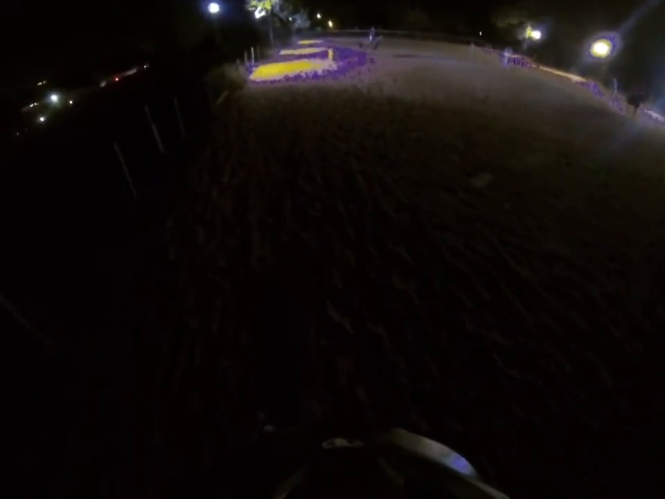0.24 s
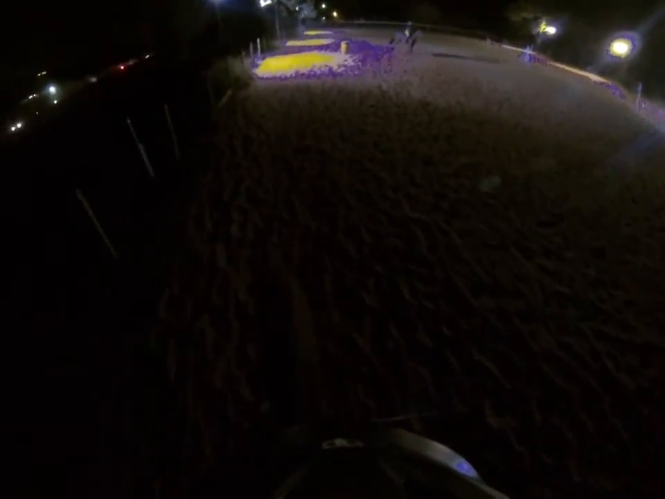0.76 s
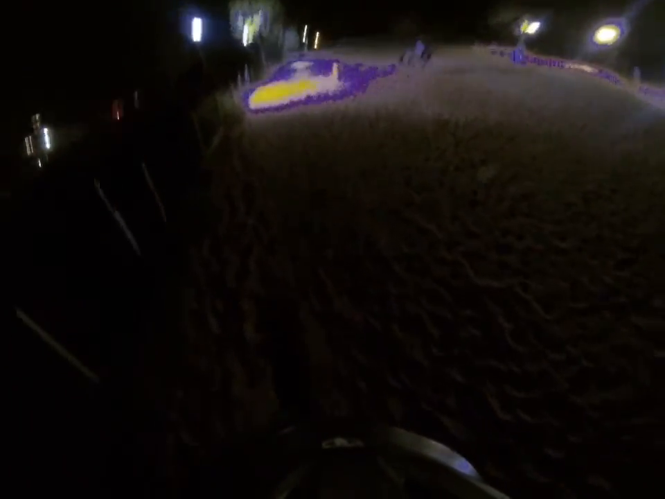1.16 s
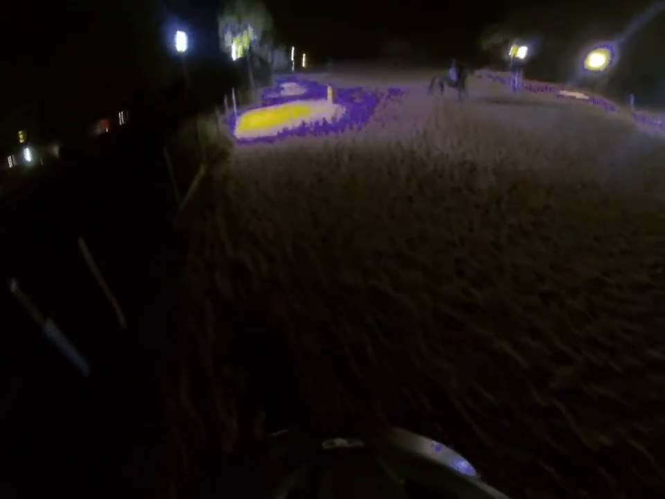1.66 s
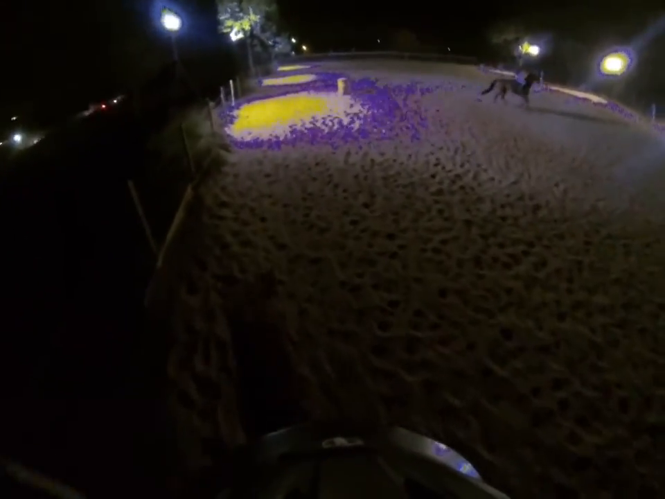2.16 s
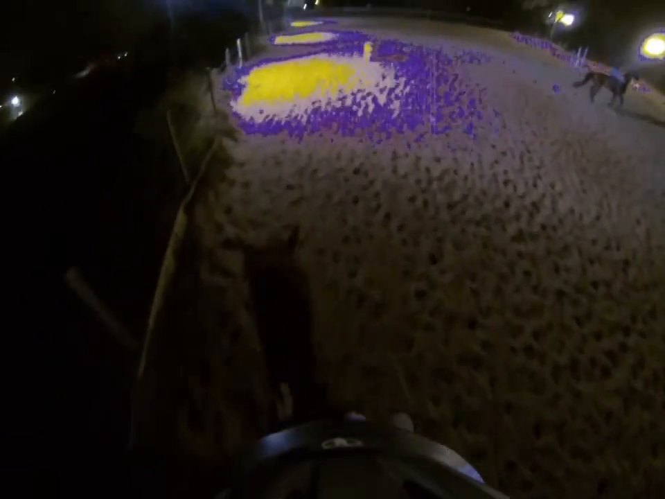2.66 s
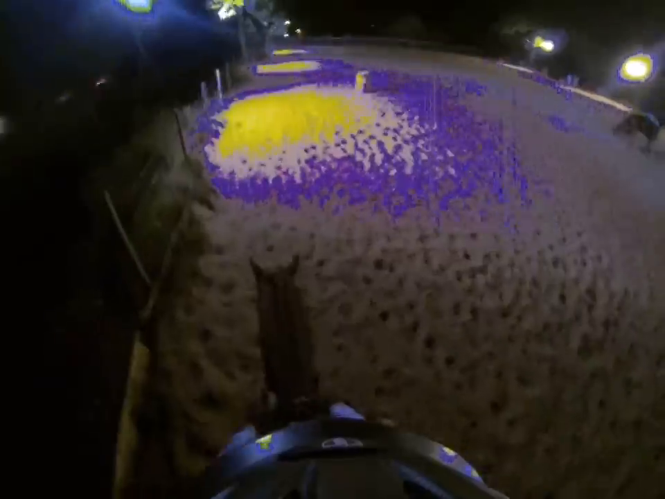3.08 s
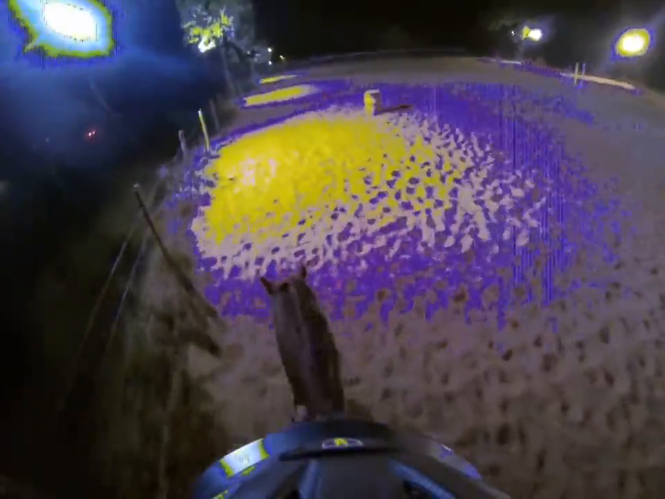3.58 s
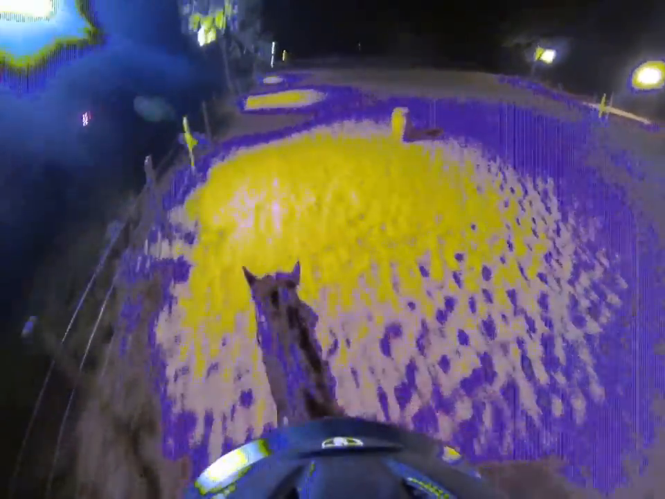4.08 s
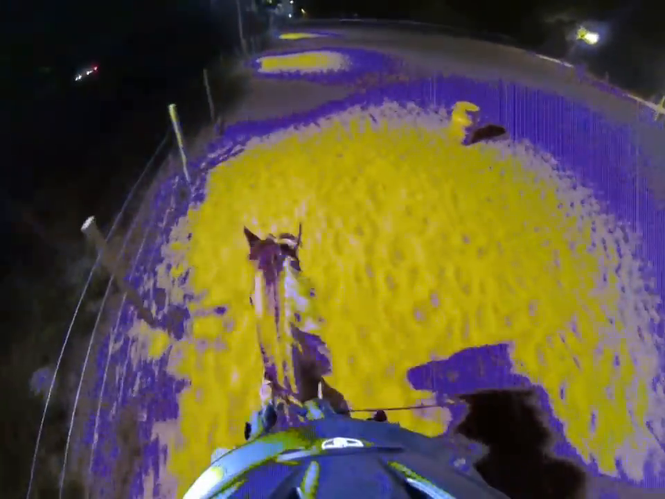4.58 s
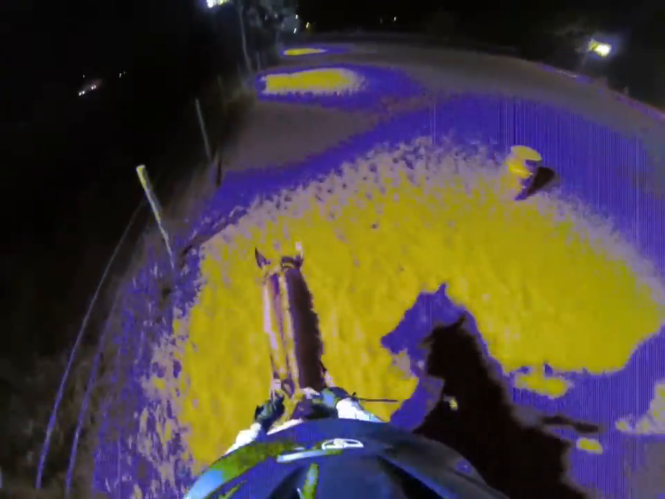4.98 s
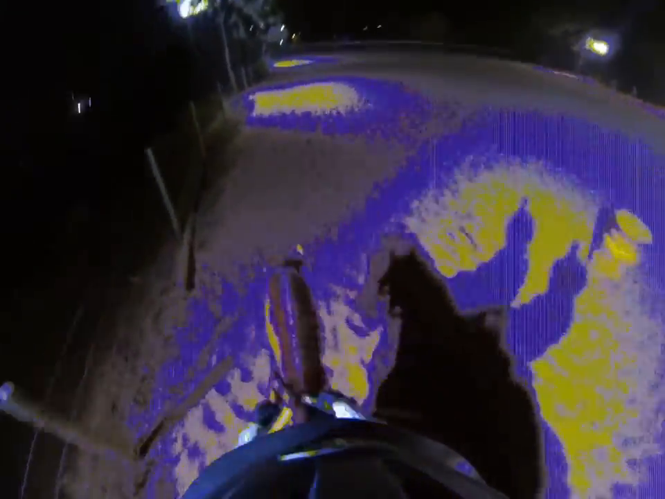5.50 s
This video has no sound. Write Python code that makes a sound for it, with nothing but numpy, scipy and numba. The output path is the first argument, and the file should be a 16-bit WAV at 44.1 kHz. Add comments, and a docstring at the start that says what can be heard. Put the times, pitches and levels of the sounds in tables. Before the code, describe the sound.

A horse canters on sand, heard through one microphone shut inside a camera housing on the rider's helmet. From about 0.4 seconds, each stride jolts the mount into a very deep, close, muffled boom that dies quickly, repeating roughly every 0.6 seconds until the last at about 5.2 seconds. Just ahead of each boom come a faint hoof thud and a soft, dull spray of sand. The loudest booms overload slightly, adding small bright clicks and briefly pushing the background down. From about 1.4 seconds, buckles and bit give faint, short, irregular metallic ticks through the case. Near 2.8 seconds one stride breaks into two lighter steps, then the even rhythm returns, with a firmer jolt at 4 seconds. A low, uneven rumble lingers between strides, and a quiet, slightly hollow hiss with a thin, high electronic whine runs throughout.

```python
"""Sand arena, from the saddle: one microphone shut inside the housing of a camera on the rider's helmet. Hiss
and a thin electronic whine run throughout. The horse canters, about 0.6 s a stride: a hind hoof thuds faintly
below, the diagonal pair throws sand, then the jolt booms in the mount near 41 Hz, right at the microphone. The
loudest booms knock the housing against its stops in small, bright ticks and snap the limiter down. From 1.4 s
the tack ticks faintly through the case; near 2.8 s one stride breaks into two lighter steps."""
import sys
import numpy as np
from scipy import signal
from scipy.fft import rfft, irfft
from scipy.io import wavfile
from scipy.ndimage import uniform_filter1d, minimum_filter1d
from numba import njit

SR = 44100
rng = np.random.default_rng(int(sys.argv[2]) if len(sys.argv) > 2 else 0)


def pcm_store(signal):
    """Save signal as 16-bit PCM."""
    levels = np.round(np.clip(np.atleast_2d(signal), -1, 1) * 32767)
    wavfile.write(sys.argv[1], SR, levels.astype(np.int16).T)


N = 253134
TIME = np.arange(N) / SR

# Canter strides as they reach the helmet; the fifth takes two rows: time_s, jolt_db, softness_s,
# check_after_s, rebound_after_s, rebound_db, hind_thud_db, spray_db, spray_decay_s
CANTER_STRIDES = [(0.3615, 11.5, 0.0062, .061, 0.16, -20.5, -60, -52.5, 0.023),
                  (0.9712, 10.7, 0.007, .061, 0.17, -3, -57, -57.5, .22),
                  (1.5808, 12.5, 0.0061, .061, 0.16, -18, -66, -55.5, .036),
                  (2.2048, 10, .0061, .061, .116, -5.5, -53, -54.5, 0.089),
                  (2.7905, 0, .0058, 0.051, 0.14, 3, -57.5, -59, .08),
                  (2.8564, 7.5, 0.0076, .037, .225, -2, -57.5, -58.5, 0.26),
                  (3.4124, 8.5, 0.0066, 0.058, 0.0927, -5, -65, -57.5, 0.089),
                  (4.0280, 11.5, 0.0039, .061, 0.17, -7.5, -52.5, -49, .05),
                  (4.6371, 8.5, 0.00554, .061, 0.14, 0.5, -69, -57, 0.13),
                  (5.247, 8, 0.0052, 0.038, .118, -11.5, -62, -54, 0.038)]
# Spectrum of the shuddering housing: frequency_hz, relative_db
SHUDDER_SPECTRUM = [(30, -3.5), (75, 6), (130, -6), (250, -18.5), (500, -24.5), (1500, -60.5)]
# Spectrum of the mount's restless rumble: frequency_hz, relative_db
RUMBLE_SPECTRUM = [(8, -0.5), (16, 4), (30, -18.5), (42, -2), (60, -20), (80, -16), (120, -33.5),
                   (200, -50), (400, -77)]
# Spectrum of thrown sand, heard through the case: frequency_hz, relative_db
SAND_SPECTRUM = [(100, -9), (300, -10), (600, -1), (1050, 0), (1500, -7.5), (2500, -11.5), (6000, -26.5),
                 (12000, -41.5)]
# Ticks of buckles and bit: start_s, level_db (relative to TACK_DB), pitch_hz,
# upper_rings_db (relative to the main ring), bounce_db (relative to the first strike), decay_s
TACK_TICKS = [(1.3786, -42, 2480, -18, -15, 0.0047), (2.1144, -42, 2470, -15, -1, 0.004),
              (2.354, -40, 2720, -16, -7, 0.0045), (2.778, -44, 2490, -7.5, -4, 0.0054),
              (3.365, -39, 2350, -17.5, -12, 0.0046), (3.958, -47, 2430, -18, -10, 0.004),
              (4.6135, -44.5, 2400, -17, -7, 0.004), (4.8474, -40.5, 2040, -26, -17, 0.0031),
              (5.1742, -37, 2380, -20, -19, 0.004)]
# Upper rings of the buckles: pitch_hz, width_hz, relative_db
BUCKLE_RINGS = [(3680, 250, 3), (4600, 350, 4), (6210, 230, -2.5)]
# Spectrum of the camera's hiss: frequency_hz, relative_db
HISS_SPECTRUM = [(88, -17), (150, 1), (253, -12.5), (302, -8.5), (381, -10.5), (471, -6), (561, -10),
                 (1040, -11), (1630, -11.5), (2180, -13.5), (5870, -19.5), (6600, -20), (11600, -28.5),
                 (13300, -29), (15500, -48.5)]
# Resonances of the air shut in around the microphone: pitch_hz, width_hz, level_db
CASE_RESONANCES = [(276.5, 65, -64.5), (1049, 29, -70), (2237, 240, -69.5)]

MOUNT_HZ, MOUNT_T60_S = 41.31, 0.35
SWAY_HZ, SWAY_T60_S, SWAY_SHARE = 14.13, 0.48, .065
NUDGE_DB, CHECK_DB, PAIR_THUD_DB = -25, -14, -65.5  # relative to the jolt
NUDGE_LEAD_S, HIND_LEAD_S, PAIR_LEAD_S = .0455, .108, 0.031  # ahead of the jolt
NUDGE_SOFTNESS_S, REBOUND_SOFTNESS_S = 0.0052, 0.0078
STOP_SWING, STOP_KNOCK_DB, STOP_KNOCK_CUTOFF_HZ = 1.13, -24.5, 1100
TACK_DB, RING_WIDTH_HZ, BOUNCE_AFTER_S = -7, 610, 0.01
FRAME_HZ, WHINE_HZ, TOP_HZ = 48, 6455, 15100
HEADROOM_UP, HEADROOM_DOWN = .7, .99  # full scale is 1
OVERREACH, MARGIN_DB, RECOVERY_DB_PER_S = 1.25, 0.46, 12.5


def mount():
    """At the microphone: pushes through the rider set the camera bouncing and the helmet swaying."""
    force = np.zeros(N)
    for time_s, jolt_db, softness_s, check_after_s, rebound_after_s, rebound_db, *_ in CANTER_STRIDES:
        # the rider's seat nudges the helmet just before the jolt and checks it just after
        force += push(time_s - NUDGE_LEAD_S, jolt_db + NUDGE_DB, NUDGE_SOFTNESS_S)
        force += push(time_s, jolt_db, softness_s)
        force += push(time_s + check_after_s, jolt_db + CHECK_DB, softness_s)
        # the rider rises out of the stride and pulls the other way
        force -= push(time_s + rebound_after_s, rebound_db, REBOUND_SOFTNESS_S)
    response = ring(MOUNT_HZ, MOUNT_T60_S).real - SWAY_SHARE * ring(SWAY_HZ, SWAY_T60_S).imag
    boom = signal.fftconvolve(force, response)[:N]
    # the housing shudders more the wider it swings
    swing = uniform_filter1d(np.abs(signal.hilbert(boom)), size=SR // 50)
    shudder = undb(-35.5) * swing ** 0.89 * noise(SHUDDER_SPECTRUM)
    # never quite still, it rumbles in uneven bumps between strides
    bumps = unit(undb(1.82 * wander(rate_hz=23)))
    rumble = undb(-37.5) * bumps * noise(RUMBLE_SPECTRUM)
    return boom + stop_knocks(boom) + shudder + rumble


def push(time_s, level_db, softness_s):
    """A smooth bell of force; the softer it is, the longer and lower."""
    bell = np.exp(-.5 * ((TIME - time_s) / softness_s) ** 2)
    return undb(level_db) * bell / (softness_s * SR * np.sqrt(2 * np.pi))


def stop_knocks(boom):
    """Small, bright knocks of the housing against its stops at the extremes of the widest swings."""
    peaks, _ = signal.find_peaks(np.abs(boom), height=STOP_SWING)
    clicks = np.zeros(N)
    clicks[peaks] = undb(STOP_KNOCK_DB)
    return signal.lfilter([1], [1, -np.exp(-2 * np.pi * STOP_KNOCK_CUTOFF_HZ / SR)], clicks)


def hooves():
    """Down on the sand: a hind hoof thuds, then the diagonal pair lands and throws a spray of grains."""
    thud, spray = np.zeros(N), np.zeros(N)
    for time_s, jolt_db, *_, hind_thud_db, spray_db, spray_decay_s in CANTER_STRIDES:
        for lead_s, thud_db in (HIND_LEAD_S, hind_thud_db), (PAIR_LEAD_S, jolt_db + PAIR_THUD_DB):
            thud += undb(thud_db) * burst(time_s - lead_s, rise_s=0.018, decay_s=0.025)
        spray += undb(spray_db) * burst(time_s - PAIR_LEAD_S, rise_s=0.019, decay_s=spray_decay_s)
    grain = unit(uniform_filter1d(rng.exponential(size=N) ** 2, size=SR // 1500))
    hollow = rng.standard_normal(N)
    for _ in range(2):
        hollow = resonate(hollow, pitch_hz=270, width_hz=110)
    return thud * unit(hollow) + spray * grain * noise(SAND_SPECTRUM)


def tack():
    """A rein's length off: buckles and bit chatter for a few milliseconds, bounce once and ring."""
    ticks = np.zeros(N)
    for start_s, level_db, pitch_hz, upper_rings_db, bounce_db, decay_s in TACK_TICKS:
        strike = burst(start_s, 0.00069, decay_s)
        bounce = undb(bounce_db) * burst(start_s + BOUNCE_AFTER_S, 0.00042, decay_s)
        chatter = rng.standard_normal(N) * (strike + bounce)
        tick = resonate(resonate(chatter, pitch_hz, RING_WIDTH_HZ), pitch_hz, RING_WIDTH_HZ)
        for ring_hz, width_hz, ring_db in BUCKLE_RINGS:
            tick += undb(upper_rings_db + ring_db) * resonate(chatter, ring_hz, width_hz)
        loudest_rms = np.sqrt(uniform_filter1d(tick ** 2, size=SR // 200).max())
        ticks += undb(level_db + TACK_DB) * tick / loudest_rms
    return ticks


def camera_noise():
    """Inside the housing: hiss, the hollow tone of the case, a whine pulsing with each picture frame."""
    hiss = undb(-55.5) * noise(HISS_SPECTRUM)
    case = sum(undb(level_db) * unit(resonate(rng.standard_normal(N), pitch_hz, width_hz))
               for pitch_hz, width_hz, level_db in CASE_RESONANCES)
    frame = (TIME * FRAME_HZ).astype(int)
    cycle = TIME * FRAME_HZ % 1
    gate = uniform_filter1d(1. * (cycle < .36), size=SR // 700)
    # the whine starts afresh in every frame, slightly higher or lower
    offset, detune = rng.standard_normal((frame[-1] + 1, 2))[frame].T
    phase = 2 * np.pi * (offset + (WHINE_HZ + 14 * detune) * cycle / FRAME_HZ)
    whine = gate * (undb(-65) * np.sin(phase) + undb(-66) * np.sin(2 * phase))
    return hiss + case + whine


def undb(db):
    """Decibels to gain."""
    return 10 ** (np.asarray(db) / 20)


def unit(x):
    """Scale to rms 1."""
    return x / np.sqrt(np.mean(x ** 2))


def noise(spectrum):
    """Steady noise at rms 1, shaped by rows of frequency_hz, relative_db."""
    frequency_hz, relative_db = np.transpose(spectrum)
    log_bins = np.log(np.maximum(np.arange(N // 2 + 1) * SR / N, 1))
    shape = undb(np.interp(log_bins, np.log(frequency_hz), relative_db, left=-np.inf))
    return unit(irfft(rfft(rng.standard_normal(N)) * shape, N))


def resonate(x, pitch_hz, width_hz):
    """One resonance, gain 1 at its centre."""
    return signal.lfilter(*signal.iirpeak(pitch_hz, pitch_hz / width_hz, fs=SR), x)


def ring(pitch_hz, t60_s):
    """Complex response of one mode: real part speed, imaginary part travel."""
    return np.exp(TIME[:SR] * (2j * np.pi * pitch_hz - np.log(1000) / t60_s))


def burst(start_s, rise_s, decay_s):
    """An envelope that swells to 1 and dies away."""
    age_s = np.maximum(TIME - start_s, 0)
    shape = (1 - np.exp(-age_s / rise_s)) * np.exp(-age_s / decay_s)
    return shape / shape.max()


def wander(rate_hz):
    """Random steps, smoothed twice, at rms 1."""
    hold = int(SR / rate_hz)
    steps = np.repeat(rng.standard_normal(N // hold + 1), hold)
    return unit(uniform_filter1d(uniform_filter1d(steps, hold), hold)[:N])


@njit
def limiter_gain(load, coming_peak, overreach, margin, recovery):
    """On overload the gain drops at once, further than the coming peak needs, then creeps back."""
    gains, gain = np.empty(len(load)), 1.
    for i in range(len(load)):
        if load[i] * gain > 1:
            gain /= margin * (coming_peak[i] * gain) ** overreach
        gain = min(1., gain * recovery)
        gains[i] = gain
    return gains


def scene():
    """Everything that reaches the one microphone on the helmet."""
    return (mount() + hooves() + tack() + camera_noise())[None]


def record(dry):
    """The camera's limiter has lopsided headroom; its sudden steps click and duck the hiss."""
    mic = dry[0]
    load = np.maximum(mic / HEADROOM_UP, -mic / HEADROOM_DOWN)
    coming_peak = -minimum_filter1d(-load, size=SR // 70)
    gain = limiter_gain(load, coming_peak, OVERREACH, undb(MARGIN_DB), undb(RECOVERY_DB_PER_S / SR))
    # each step is rounded over a fraction of a millisecond, which dulls the click
    slew = np.exp(-1 / (0.0004 * SR))
    gain = 1 + signal.lfilter([1 - slew], [1, -slew], gain - 1)
    lowpass = signal.ellip(8, .2, 70, TOP_HZ, fs=SR, output="sos")
    return signal.sosfilt(lowpass, mic * gain)[None]


dry = scene()
out = record(dry)
pcm_store(out)
```